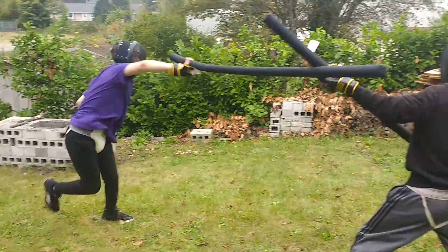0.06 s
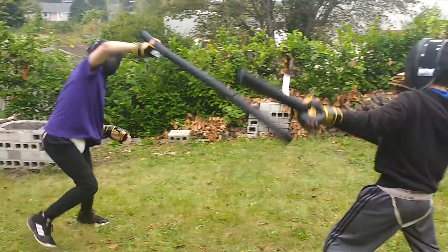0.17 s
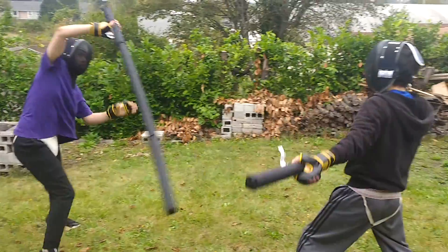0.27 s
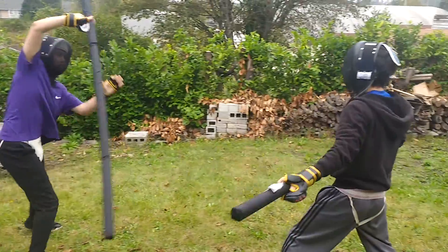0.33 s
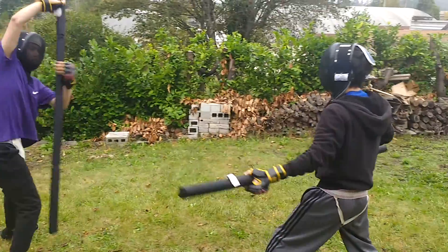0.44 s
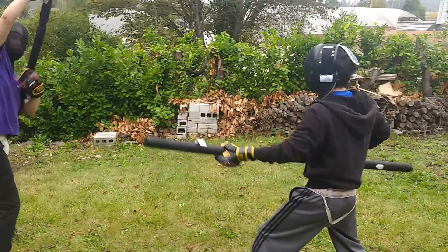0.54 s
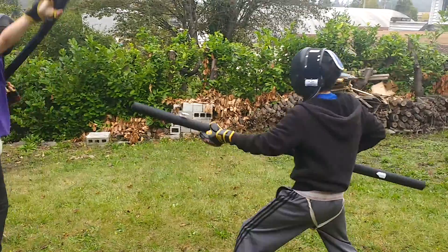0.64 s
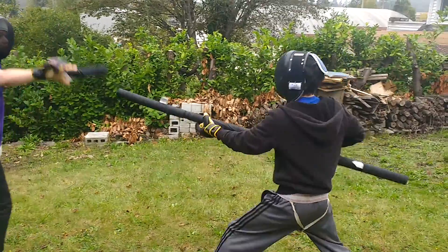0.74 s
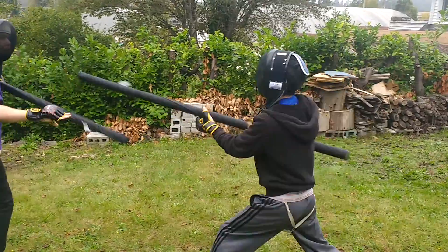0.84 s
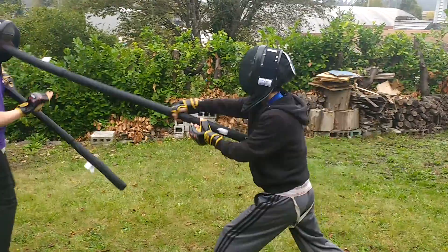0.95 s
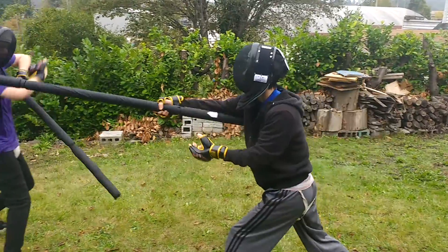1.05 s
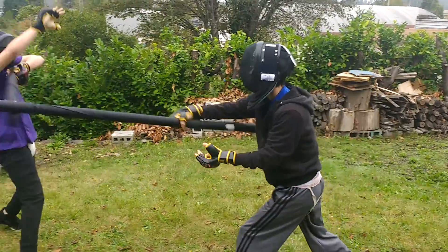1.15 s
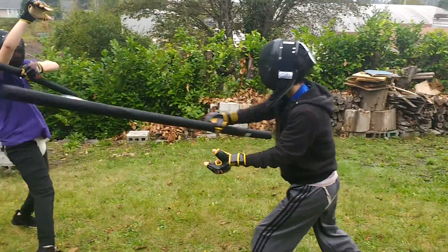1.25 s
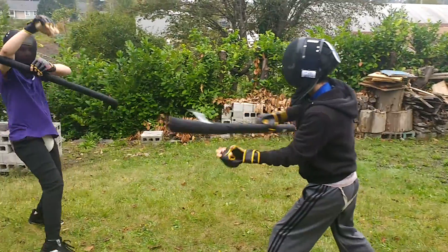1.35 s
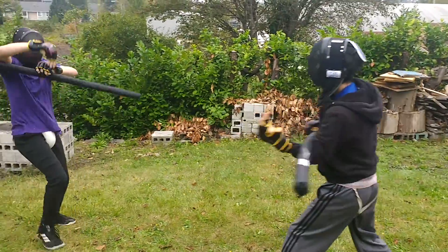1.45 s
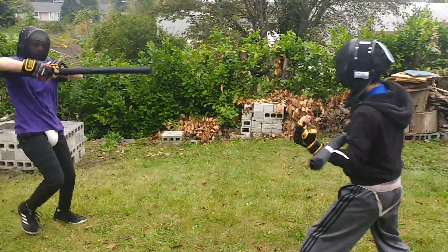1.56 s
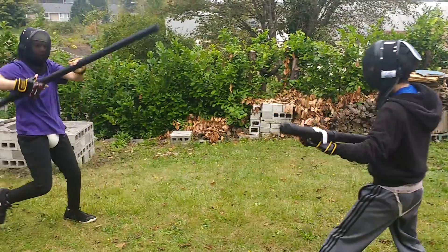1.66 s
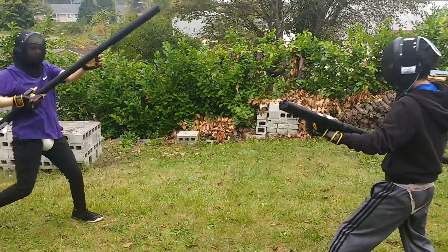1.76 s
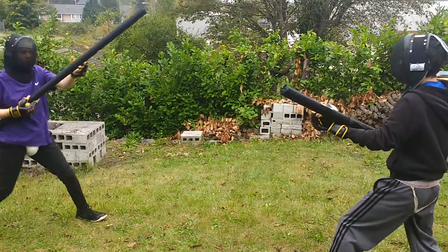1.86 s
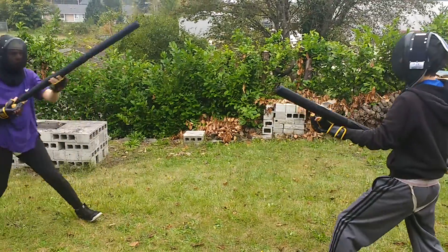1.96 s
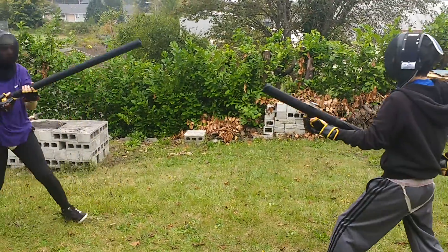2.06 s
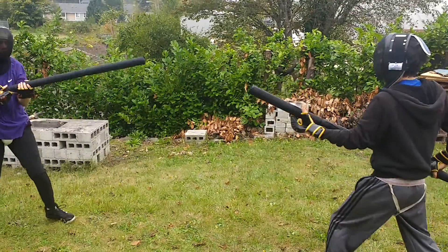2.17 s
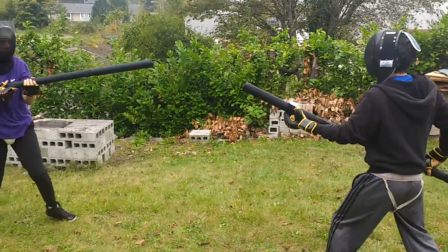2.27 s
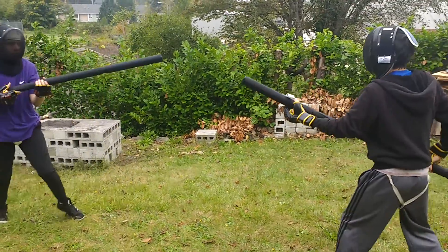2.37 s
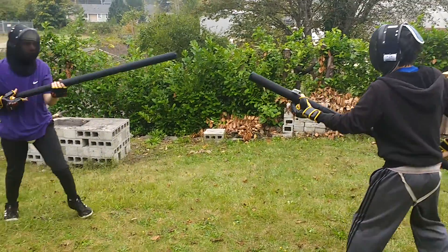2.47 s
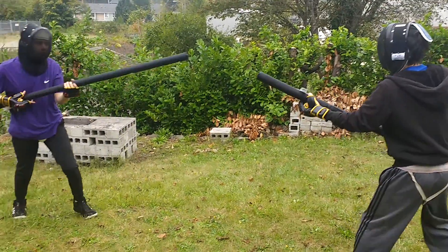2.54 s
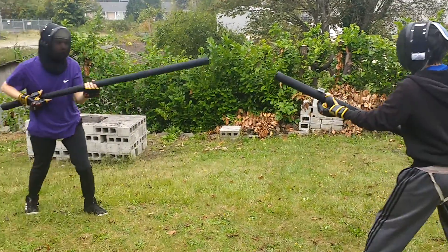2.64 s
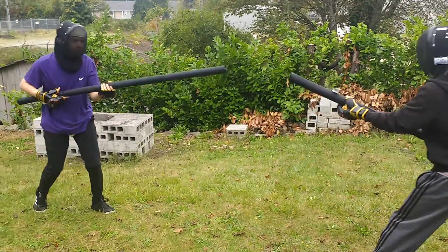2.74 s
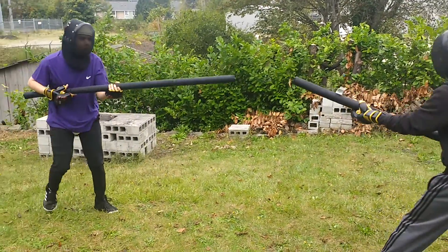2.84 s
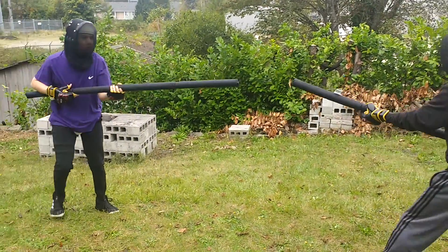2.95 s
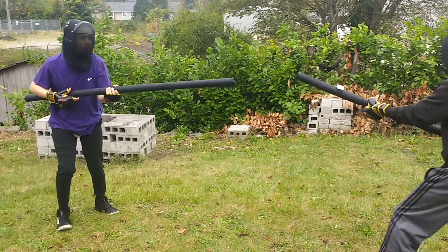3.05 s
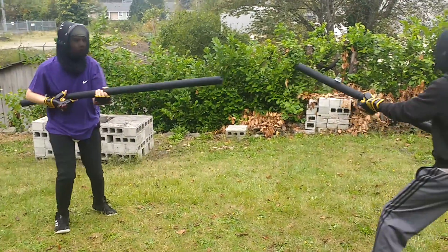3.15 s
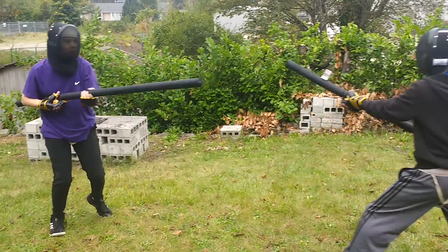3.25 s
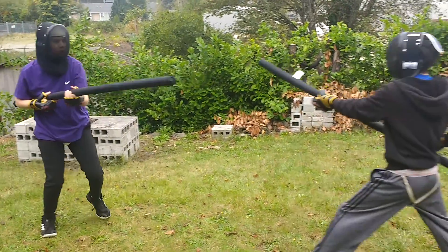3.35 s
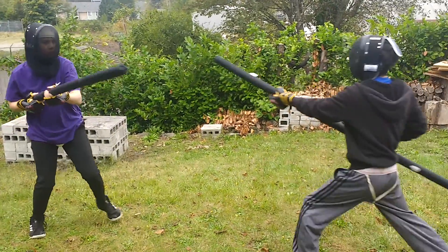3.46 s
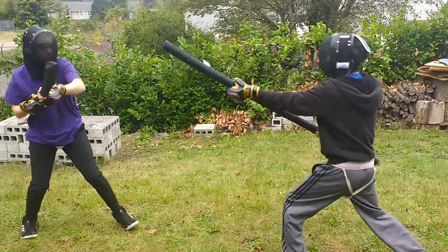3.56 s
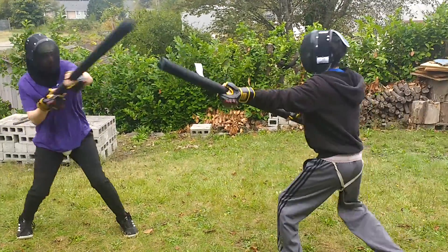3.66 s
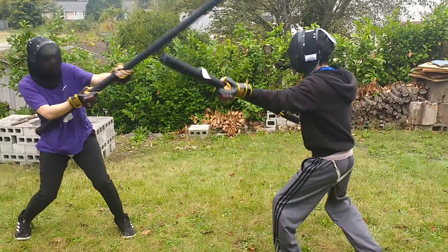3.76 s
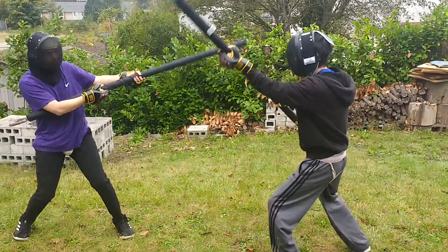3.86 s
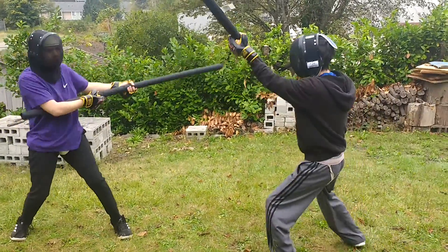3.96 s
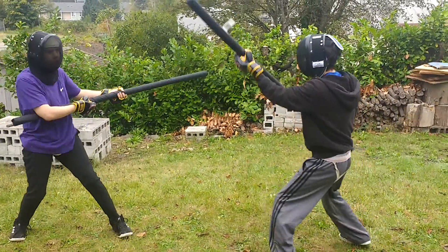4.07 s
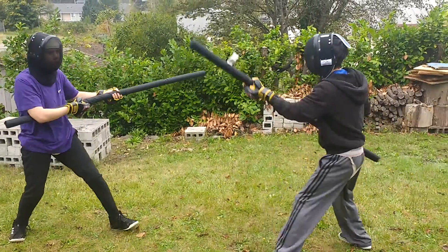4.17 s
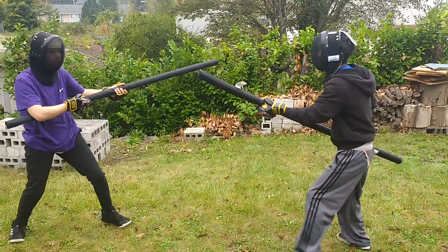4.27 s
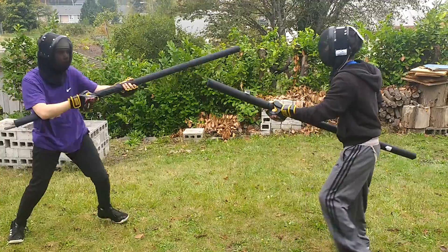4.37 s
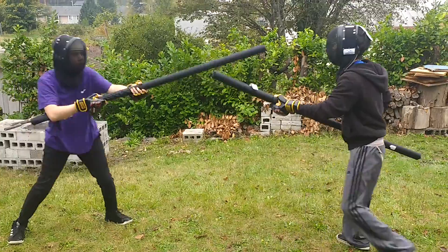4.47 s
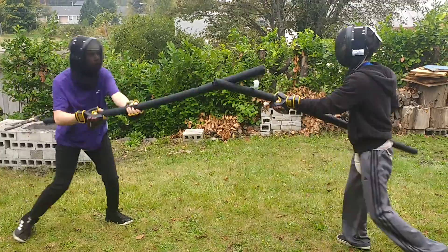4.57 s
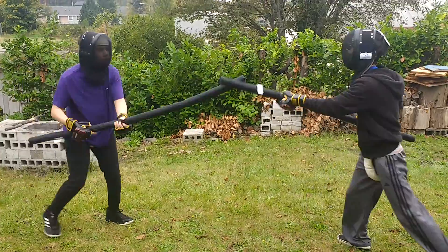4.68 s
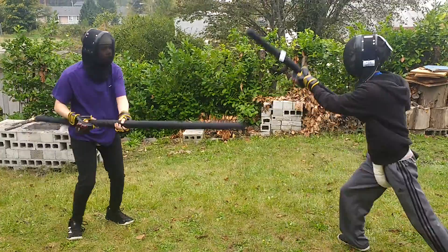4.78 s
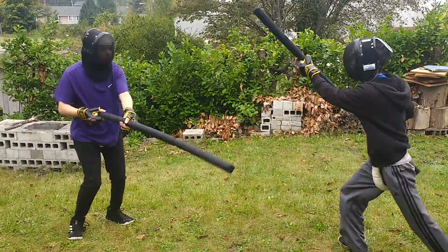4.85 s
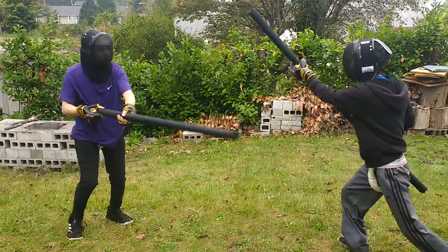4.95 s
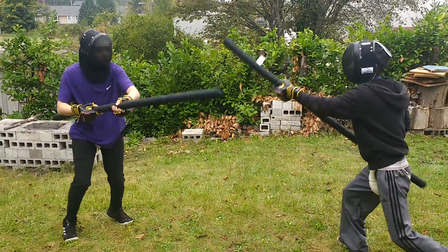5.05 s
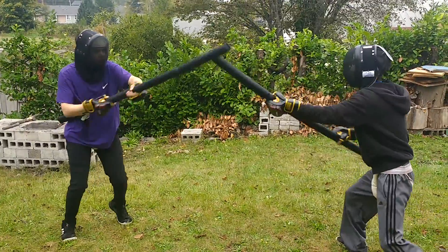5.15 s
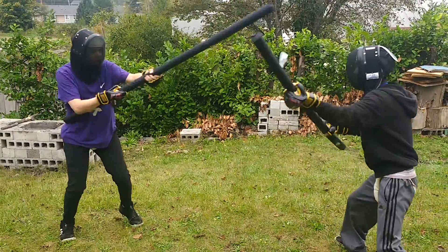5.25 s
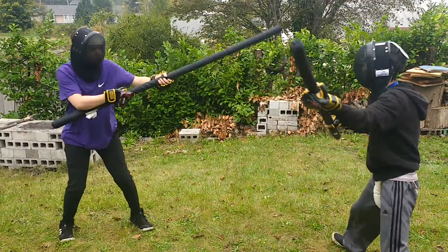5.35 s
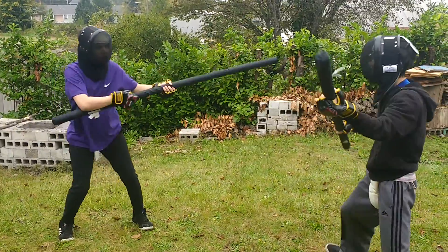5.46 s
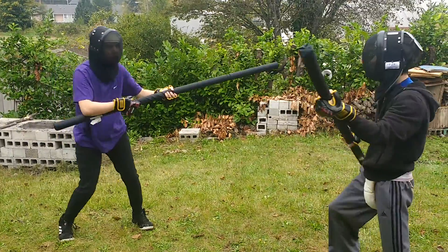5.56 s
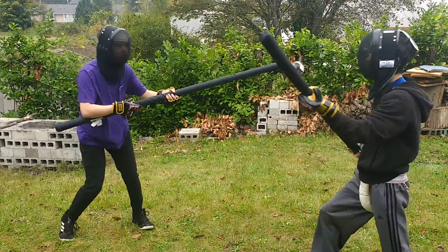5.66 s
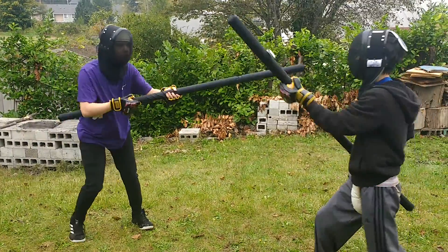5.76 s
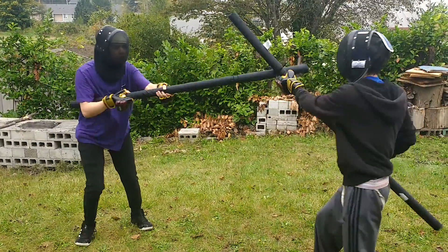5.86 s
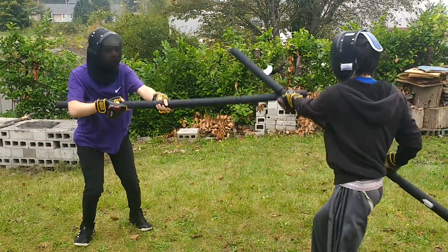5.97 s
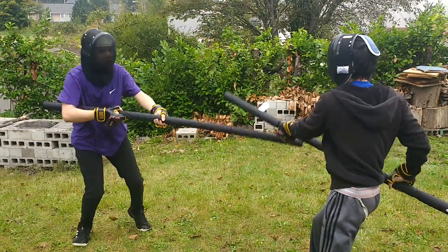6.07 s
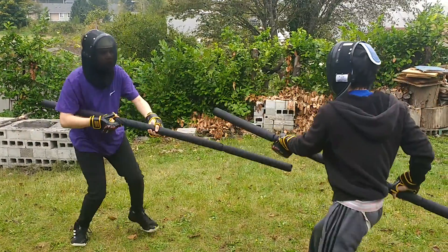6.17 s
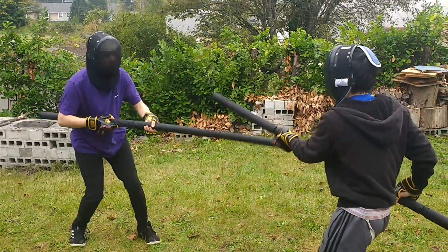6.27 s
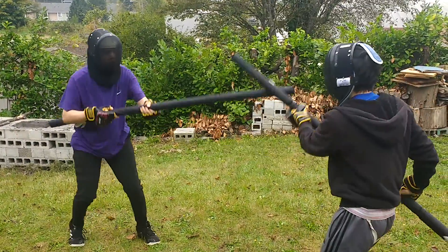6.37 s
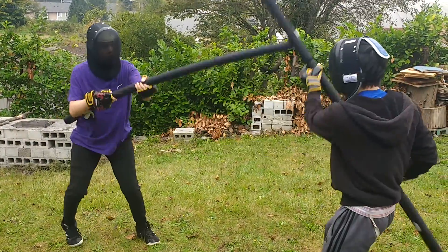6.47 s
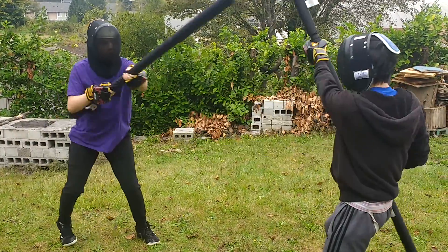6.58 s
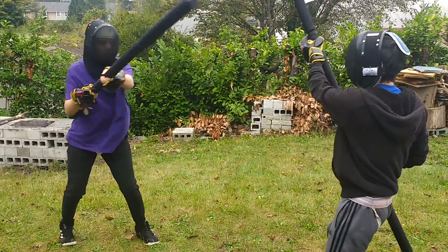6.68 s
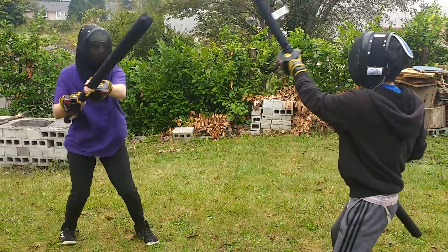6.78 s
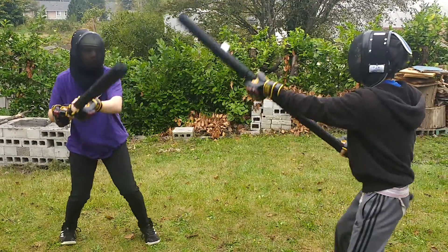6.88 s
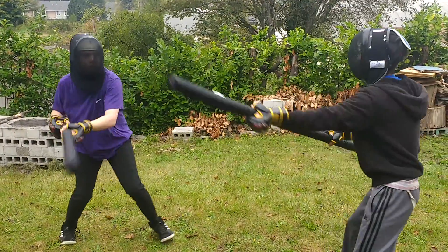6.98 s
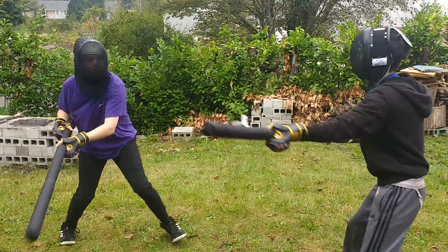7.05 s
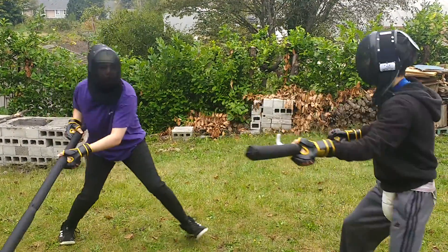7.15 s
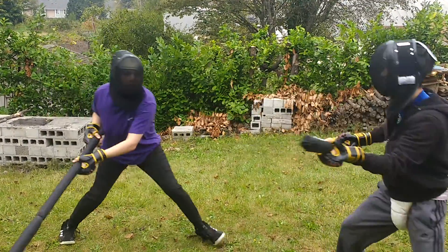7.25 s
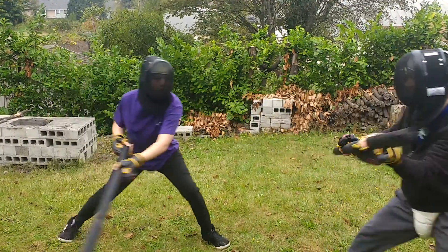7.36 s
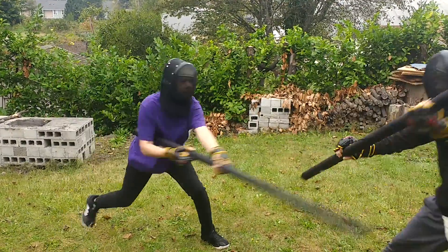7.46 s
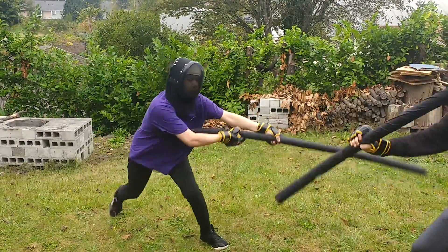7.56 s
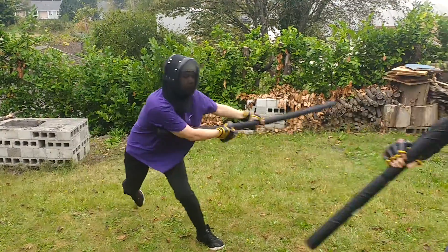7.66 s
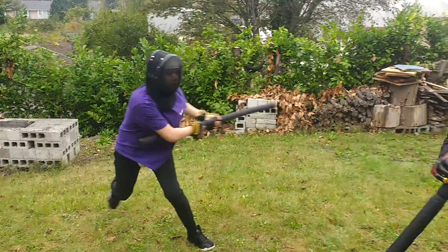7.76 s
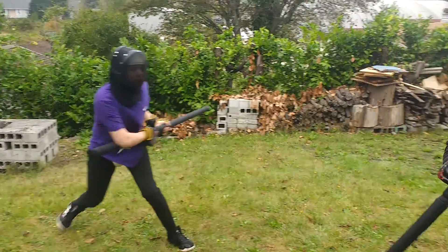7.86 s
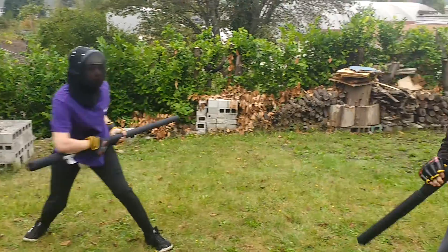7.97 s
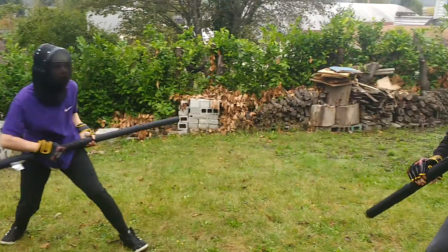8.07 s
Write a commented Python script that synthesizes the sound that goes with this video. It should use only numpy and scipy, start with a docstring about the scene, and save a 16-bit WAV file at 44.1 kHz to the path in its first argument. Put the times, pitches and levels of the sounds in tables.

```python
"""Padded poles sparring on a lawn

Two people trade blows with foam-padded poles: each hit is a short hollow thud with a slap of air squeezed from
the foam, then a scrape as the poles slide on. Clothes swish, and gear and foam tick and snap. A hedge scatters
the action back, a small bird whistles two notes three times, and distant traffic hisses on. All of it is heard
through a phone's two microphones, a few metres away."""
import sys
import numpy as np
from scipy import signal
from scipy.fft import rfft, irfft, next_fast_len
from scipy.io import wavfile

SR = 44100
rng = np.random.default_rng(int(sys.argv[2]) if len(sys.argv) > 2 else 0)


def log_audio(samples):
    """Write samples as a 16-bit WAV file to the path given in sys.argv[1]."""
    # one column per channel
    frames = np.atleast_2d(samples).T
    # limit to full scale, then quantise
    limited = np.clip(frames, -1, 1)
    pcm = np.round(limited * 32767).astype(np.int16)
    wavfile.write(sys.argv[1], SR, pcm)


N = 358091
T = np.arange(N) / SR

# The hits, pole on pole. Each row: start in seconds, level in dB, thud pitch in Hz, frequency that the
# point of impact favours in Hz, slap trim in dB, rebound trim in dB, level of the slide after it in dB.
BLOWS = [(1.033, -24.5, 286, 810, 7, 0, -35.5), (1.2333, -17.5, 245, 357, -5, -3.5, -33.5),
         (4.6069, -17, 244, 377, 6.5, -1, -34.5), (5.2169, -24.5, 238, 706, 8.5, 5, -29.5),
         (5.927, -13.5, 213, 690, 7.5, 3.5, -35.5), (6.4559, -25.5, 255, 457, 5, -0.5, -43.5),
         (6.6339, -27, 355, 355, -15, -11.5, -50), (7.5749, -9.5, 354, 530, -6.5, -30, -33.5)]
# The hollow body of a padded pole. Each row: mode frequency in Hz, level in dB, T60 in seconds.
POLE_MODES = [(335, -3.5, 0.042), (537, -6.5, 0.017), (684, -5, 0.019), (818, -7, 0.036), (1260, 4, 0.003),
              (2273, -10, 0.027), (2660, -14.5, 0.027)]
# The tone of the foam's slap and of the hard core's click. Each row: frequency in Hz, level in dB.
SLAP_SPECTRUM = [(200, 15), (700, -20), (1500, -4), (3000, 3), (5000, -4), (8500, -13), (15000, -31)]
CORE_SPECTRUM = [(500, -25), (2500, -42), (7000, 19), (15000, -4)]


def pole_knocks(thud_t60_s=.021, slap_fall_s=.0017, compress_s=.000092, rebound_s=.004, full_db=-26.5):
    """Each blow rings the pole and slaps air out of the foam; the soft poles meet again a moment later."""
    out, t = np.zeros(N), T[:SR // 8]
    attack = 1 - np.exp(-t / compress_s)  # the padding takes a moment to give
    for s, db, thud_hz, favoured_hz, slap_db, rebound_db, _ in BLOWS:
        modes_db = -1.5 + 2.5 * min(db - full_db, 0)  # less than a full blow rings the modes less
        body = ring(t, thud_hz, thud_t60_s)
        for hz, mode_db, t60 in POLE_MODES:
            # modes that swing widest at the point of impact ring loudest
            favour_db = 7 * np.exp(-(np.log2(hz / favoured_hz) / .1) ** 2)
            detuned_hz = hz * (1 + .015 * rng.standard_normal())
            body += undb(modes_db + mode_db + favour_db) * ring(t, detuned_hz, t60)
        tilt_db = 4.5 - .95 * slap_db  # a fuller slap is a duller one
        for delay, contact_db in ((0, 0), (rebound_s, rebound_db)):
            slap = undb(slap_db - 7) * noise(len(t), SLAP_SPECTRUM, tilt_db) * np.exp(-t / slap_fall_s)
            add(out, s + delay, undb(db + contact_db) * (body + slap) * attack)
        # the core clicks through the foam, less so under a soft slap
        click = noise(len(t), CORE_SPECTRUM) * np.exp(-t / .0004)
        add(out, s, undb(db - 5 + min(slap_db, 0)) * click)
    # a thin pole radiates little bass
    return signal.sosfilt(signal.butter(3, 120, "high", fs=SR, output="sos"), out)


# Grazes of foam on foam. Each row: peak time in seconds, level in dB, rise plus fall time in seconds,
# tilt in dB per octave.
GRAZES = [(.01, -37.5, 0.11, 6), (.985, -34, 0.14, -0.5), (2.745, -34, 0.046, 2), (2.975, -33, 0.085, 1),
          (3.006, -32.5, .06, 3.5), (6.556, -38, 0.035, 12.5)]
# The rasp of rubbed foam. Each row: frequency in Hz, level in dB.
FOAM_SPECTRUM = [(100, -33), (350, -0.5), (800, 5), (1250, 4), (1900, 1), (2900, -1), (5000, -4),
                 (8000, -16.5), (15000, -37)]


def foam_scrapes(peak_after_s=.03, rise_s=.026, fall_s=.034, tilt_db=3.2):
    """The poles slide along each other after every blow, and sometimes only graze."""
    slides = [(s + peak_after_s, db, rise_s, fall_s, tilt_db) for s, *_, db in BLOWS]
    strokes = slides + split_lengths(GRAZES, rise_share=.37)
    return friction(strokes, FOAM_SPECTRUM, grain_db=2.5, grain_hz=600, snag_db=-3)


# Swishes of sleeves and trousers. Each row: peak time in seconds, level in dB, rise plus fall time
# in seconds, tilt in dB per octave.
CLOTH_SWISHES = [(.13, -40, 0.12, -4), (.61, -41, 0.22, -5), (.91, -43.5, 0.36, 0), (1.57, -50, 0.1, -8.5),
                 (1.78, -46.5, 0.14, -4.5), (2.15, -43, 0.29, -6), (4.37, -53, 0.26, -1.5),
                 (4.75, -38.5, 0.13, 0), (5.52, -56, 0.087, 14), (6.52, -45, 0.14, -2.5),
                 (7.0, -43.5, 0.18, -7), (7.53, -46, 0.3, -5.5), (7.82, -60.5, 0.59, -2.5)]
# Sudden scuffs that trail off. Each row: peak time in seconds, level in dB, tilt in dB per octave.
CLOTH_SCUFFS = [(3.228, -38.5, -2), (3.886, -40, -5.5)]
# The airy tone of fabric. Each row: frequency in Hz, level in dB.
CLOTH_SPECTRUM = [(150, -33), (800, -22), (1600, -8.5), (2700, -5), (4500, -1.5), (6500, -4), (10000, -9.5),
                  (15000, -21.5)]


def clothes(scuff_rise_s=.0041, scuff_fall_s=.11):
    """Cloth swishes with each lunge and scuffs when it is caught suddenly."""
    scuffs = [(s, db, scuff_rise_s, scuff_fall_s, tilt_db) for s, db, tilt_db in CLOTH_SCUFFS]
    strokes = split_lengths(CLOTH_SWISHES, rise_share=.36) + scuffs
    return friction(strokes, CLOTH_SPECTRUM, grain_db=1.5, grain_hz=150, snag_db=-9)


# Crisp ticks and snaps: gear, the foam snapping as the poles scrape, a light tap just before a blow. # Each
# row: start in seconds, level in dB, pitch in Hz.
TICKS = [(1.024, -30.5, 710), (2.737, -26, 1430), (2.7539, -33, 1440), (2.9715, -26, 1800),
         (2.99, -19, 2660), (3.223, -25, 5100), (3.466, -32, 5500), (3.9372, -29.5, 5370),
         (6.354, -43, 8350), (6.3834, -32.5, 5270), (7.253, -36.5, 2750)]


def ticks():
    """Gear, snagging foam and light taps snap and click in very short bursts."""
    out = np.zeros(N)
    for s, db, hz in TICKS:
        add(out, s, undb(db) * burst(hz, fall_s=.002, octaves=.8, skirt_db=-22.5))
    return out


# Faint hollow pocks. Each row: start in seconds, level in dB, fall time in seconds.
SOFT_POCKS = [(2.08, -29.5, .022), (2.322, -30, .02), (4.0185, -23.5, .0022), (6.553, -24, .005),
              (7.985, -40.5, 0.025)]


def soft_pocks(pitch_hz=794):
    """A soft contact swells before it dies away."""
    out = np.zeros(N)
    for s, db, fall_s in SOFT_POCKS:
        pock = burst(pitch_hz, fall_s, octaves=.69, skirt_db=-20.5)
        swell = 1 - np.exp(-2 * T[:len(pock)] / fall_s)
        add(out, s, undb(db) * pock * swell)
    return out


# Little squeaks. Each row: start in seconds, level in dB, pitch in Hz, fall time in seconds.
FOAM_SQUEAKS = [(1.038, -20.5, 2400, 0.0061), (1.054, -26.5, 1320, 0.0084), (5.252, -31.5, 1150, 0.035),
                (7.521, -43, 2460, 0.062)]


def foam_squeaks():
    """The foam catches and squeaks in a narrow band."""
    out = np.zeros(N)
    for s, db, hz, fall_s in FOAM_SQUEAKS:
        add(out, s, undb(db) * burst(hz, fall_s, octaves=.4, skirt_db=-11.5))
    return out


# The hedge's bright scatter and the yard's dull bass echo. Each row: frequency in Hz, level in dB.
HEDGE_SPECTRUM = [(100, 5), (300, 3), (1000, 19.5), (2500, 19.5), (6000, 12.5), (15000, 23.5)]
BASS_ECHO_SPECTRUM = [(60, -12), (130, 9), (250, 9), (450, 15), (800, -12), (2000, -32)]


def yard_echo(x, spectrum, wet_db, rise_s, fall_s):
    """Hedge, wall and woodpile scatter a short tail, different on each side."""
    t = T[:SR // 3]
    envelope = np.minimum(t / rise_s, 1) ** 2 * np.exp(-t / fall_s)
    tails = [noise(len(t), spectrum) * envelope for _ in range(2)]
    return undb(wet_db) * np.array([reverberate(x, tail) for tail in tails])


# The bird's cues. Each row: start in seconds, level of the rising note in dB, of the arched note in dB.
BIRD_SONGS = [(0.645, -42, -38), (4.163, -40.5, -35), (6.008, -45, -37.5)]
# Its two notes. Each row: offset in seconds, length in seconds, first, middle and last pitch in Hz.
BIRD_NOTES = [(0, .125, 4330, 4776, 5210), (0.171, .115, 3600, 4576, 4044)]


def bird(glide_skew=.79, direct_db=-5, trees_db=-6, trees_fall_s=.069):
    """A rising whistle and an arched one, the same song each time, smeared by the trees."""
    out = np.zeros(N)
    for s, *levels_db in BIRD_SONGS:
        for (offset, length, *pitches_hz), db in zip(BIRD_NOTES, levels_db):
            progress = np.linspace(0, 1, int(length * SR))
            contour = np.polyfit([0, .5, 1], pitches_hz, 2)
            burr = 1 + .012 * wander(len(progress), 500)
            hz = np.polyval(contour, progress ** glide_skew) * burr  # the skew hurries the early glide
            envelope = np.sqrt(np.abs(np.sin(np.pi * progress)))
            add(out, s + offset, undb(db) * envelope * np.sin(2 * np.pi * np.cumsum(hz) / SR))
    trees = rng.standard_normal(SR // 2) * np.exp(-T[:SR // 2] / trees_fall_s)
    return undb(direct_db) * out + undb(trees_db) * reverberate(out, trees)


# The bed of far road noise. Each row: frequency in Hz, level in dB.
TRAFFIC_SPECTRUM = [(25, -63), (55, -13), (80, -10), (112, 3), (200, -1), (350, -0.5), (560, -3.5),
                    (780, -0.5), (1150, -6), (1700, -9.5), (2800, -11.5), (5000, -18.5), (9000, -29),
                    (15500, -35.5)]
# How focused the bed is. Each row: frequency in Hz, share of the power from ahead, 0 to 1.
AHEAD_SHARE = [(60, 0), (200, 0.5), (480, 0.11), (700, 0.8), (1100, 1), (1500, 0.71), (2500, 1), (6000, 1),
               (14000, 1)]
# The bed dips after three of the blows. Each row: start in seconds, depth in dB.
TRAFFIC_DIPS = [(1.24, 7.5), (5.93, 3.5), (7.58, 10.5)]


def traffic(start_db=-40.5, fade_db_per_s=.3137, sink_s=.08, hold_s=.2, recover_s=.66):
    """Far road noise, part from ahead and part from all around; it wavers, dips and slowly eases off."""
    size = next_fast_len(N)
    share = np.clip(curve_at(AHEAD_SHARE, np.fft.rfftfreq(size, 1 / SR)), 0, 1)
    ahead = rfft(mic_pair(noise(N, TRAFFIC_SPECTRUM)), size)
    around = rfft([noise(N, TRAFFIC_SPECTRUM) for _ in range(2)], size)
    bed = irfft(np.sqrt(share) * ahead + np.sqrt(1 - share) * around, size)[:, :N]
    corners_s = np.cumsum([0, sink_s, hold_s, recover_s])
    dips_db = sum(depth_db * np.interp(T - s, corners_s, [0, 1, 1, 0]) for s, depth_db in TRAFFIC_DIPS)
    waver_db = .45 * wander(N, 12)
    return bed * undb(start_db - fade_db_per_s * T - dips_db + waver_db)


def ring(t, hz, t60):
    """A struck mode; the air is first drawn in, then pushed out."""
    return -np.cos(2 * np.pi * hz * t) * np.exp(-np.log(1000) * t / t60)


def friction(strokes, spectrum, grain_db, grain_hz, snag_db, snags_per_s=220, snag_fall_s=.0005):
    """Rubbing strokes that swell and die away, sticking, slipping and snagging in tiny impacts."""
    out = np.zeros(N)
    t = np.arange(-SR // 3, 2 * SR // 3) / SR  # zero at the stroke's peak
    for s, db, rise_s, fall_s, tilt_db in strokes:
        envelope = np.exp(-np.where(t < 0, (t / rise_s) ** 2, np.abs(t / fall_s) ** 1.2))
        catches = (rng.random(len(t)) < snags_per_s / SR) * rng.exponential(size=len(t))
        snags = signal.lfilter([1], [1, -np.exp(-1 / (snag_fall_s * SR))], catches)
        grip = undb(grain_db * wander(len(t), grain_hz)) + undb(snag_db) * snags / snags.std()
        grip /= np.sqrt(np.mean(grip ** 2))
        add(out, s + t[0], undb(db) * envelope * grip * noise(len(t), spectrum, tilt_db))
    return out


def split_lengths(strokes, rise_share):
    """Split each stroke's length into a rise and a fall."""
    return [(s, db, rise_share * length, (1 - rise_share) * length, tilt_db)
            for s, db, length, tilt_db in strokes]


def burst(hz, fall_s, octaves, skirt_db):
    """Decaying noise in one resonance, down to skirt_db at the given octaves either side."""
    t, ratio = T[:SR // 6], 2 ** octaves
    spectrum = [(hz / ratio ** 2 / 2, 2 * skirt_db), (hz / ratio, skirt_db), (hz, 0),
                (hz * ratio, skirt_db), (hz * ratio ** 2 * 2, 2 * skirt_db)]
    return noise(len(t), spectrum) * np.exp(-t / fall_s)


def noise(length, spectrum, tilt_db=0):
    """Noise of rms 1 with the given spectrum, tilted by tilt_db per octave above 500 Hz."""
    size = next_fast_len(length)
    hz = np.fft.rfftfreq(size, 1 / SR)
    db = curve_at(spectrum, hz) + tilt_db * np.log2(np.maximum(hz, 500) / 2000)
    x = irfft(rfft(rng.standard_normal(size)) * undb(db), size)[:length]
    return x / x.std()


def mic_pair(x, lag_s=.00056, knee_hz=893, knee_width_hz=120):
    """The two microphones are in step in the bass; higher up the left one lags."""
    size = next_fast_len(N + SR // 10)
    hz = np.fft.rfftfreq(size, 1 / SR)
    above_knee_hz = knee_width_hz * np.logaddexp(0, (hz - knee_hz) / knee_width_hz)
    phase = 2 * np.pi * lag_s * above_knee_hz
    return irfft(rfft(x, size) * np.exp(-1j * spread(phase)), size)[:, :N]


def spread(difference):
    """Share a left-minus-right difference equally between the two sides."""
    return np.array([[.5], [-.5]]) * difference


def reverberate(x, tail):
    """Play a sound through a tail scaled to unit energy."""
    return signal.fftconvolve(x, tail / np.linalg.norm(tail))[:N]


def wander(length, rate_hz):
    """Smooth random drift with a spread near 1."""
    return np.interp(np.arange(length) / SR * rate_hz, np.arange(4096), rng.standard_normal(4096))


def curve_at(points, hz):
    """Read a (Hz, value) table on a log-frequency axis."""
    points_hz, values = np.transpose(points)
    return np.interp(np.log(hz + 1), np.log(points_hz), values)


def undb(db):
    """Decibels to gain."""
    return 10 ** (np.asarray(db) / 20)


def add(track, s, x):
    """Mix a sound into a track from s seconds on."""
    start = int(round(s * SR))
    lo, hi = max(start, 0), min(start + len(x), N)
    track[lo:hi] += x[lo - start:hi - start]


def scene(knocks_left_db=6, bass_delay_s=.018):
    """Knocks up front and to the left, then handling, bird and yard, over the traffic bed."""
    knocks = pole_knocks()
    handling = foam_scrapes() + clothes() + ticks() + soft_pocks() + foam_squeaks()
    direct = mic_pair(knocks) * undb(spread(knocks_left_db)) + mic_pair(handling + bird())
    scatter = yard_echo(knocks + handling, HEDGE_SPECTRUM, wet_db=-5, rise_s=.0057, fall_s=.014)
    # the bass comes back late from the far side of the yard
    late_knocks = np.pad(knocks, (int(bass_delay_s * SR), 0))[:N]
    bass_echo = yard_echo(late_knocks, BASS_ECHO_SPECTRUM, wet_db=-28.5, rise_s=.0043, fall_s=.011)
    return direct + scatter + bass_echo + traffic()


# The microphones' balance across the range. Each row: frequency in Hz, left minus right in dB.
MIC_BALANCE = [(60, -5), (125, -2.5), (250, -4), (500, -2.5), (1000, 0), (3000, 0), (12000, 0)]


def record(dry, ceiling=.85, top_hz=15800):
    """The microphones differ a little in colour; the phone rounds the loudest peaks and cuts the top."""
    size = next_fast_len(N + SR // 10)
    balance_db = spread(curve_at(MIC_BALANCE, np.fft.rfftfreq(size, 1 / SR)))
    coloured = irfft(rfft(dry, size) * undb(balance_db), size)[:, :N]
    rounded = ceiling * np.tanh(coloured / ceiling)
    return signal.sosfilt(signal.ellip(10, .2, 80, top_hz, fs=SR, output="sos"), rounded)


dry = scene()
out = record(dry)
log_audio(out)
```